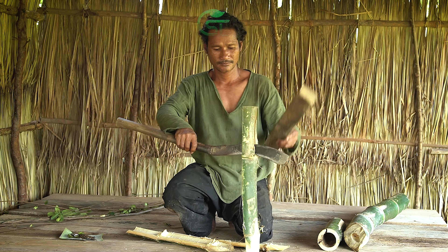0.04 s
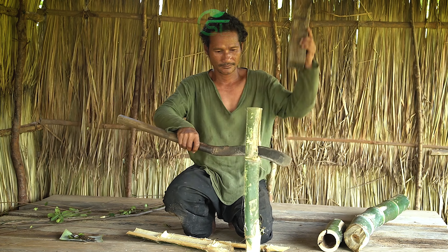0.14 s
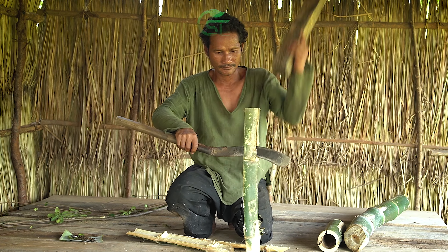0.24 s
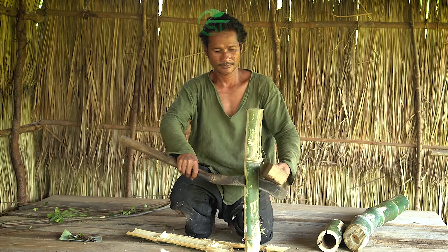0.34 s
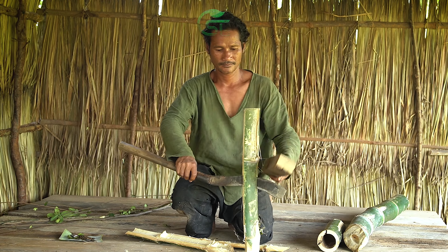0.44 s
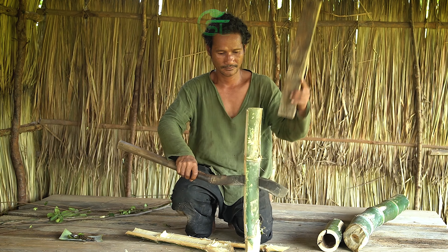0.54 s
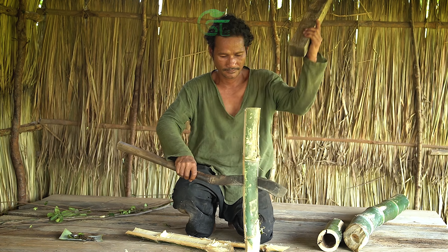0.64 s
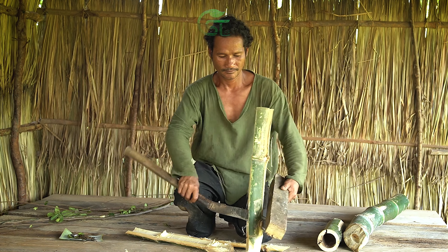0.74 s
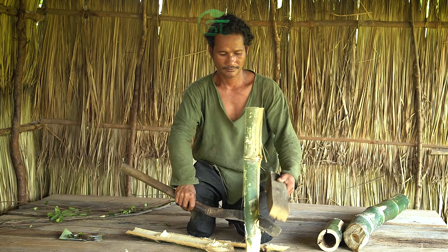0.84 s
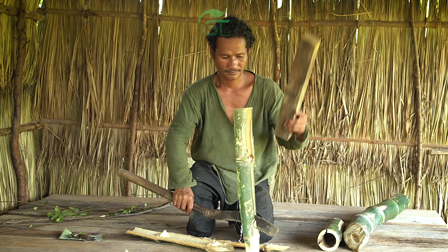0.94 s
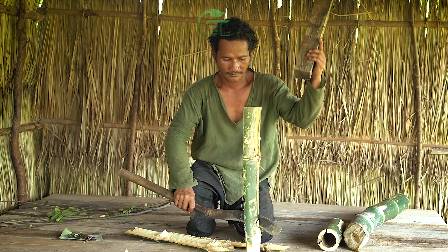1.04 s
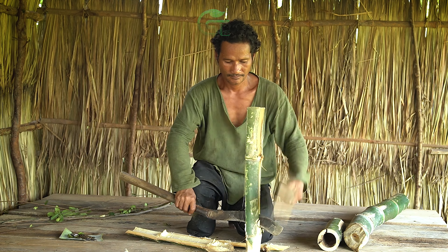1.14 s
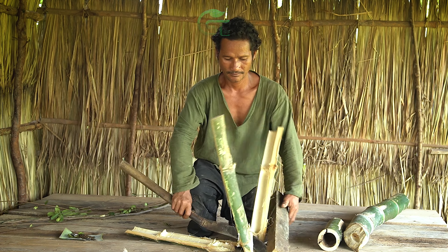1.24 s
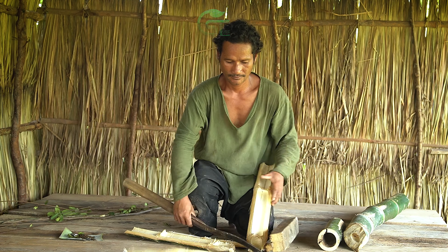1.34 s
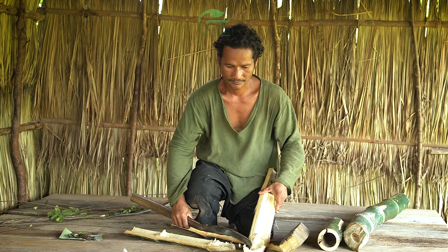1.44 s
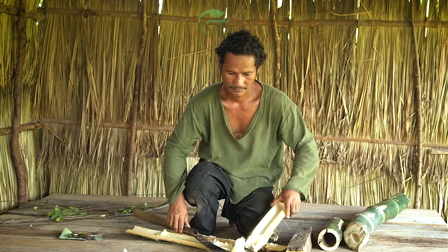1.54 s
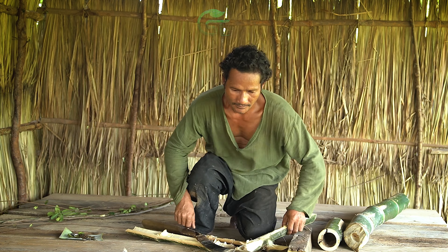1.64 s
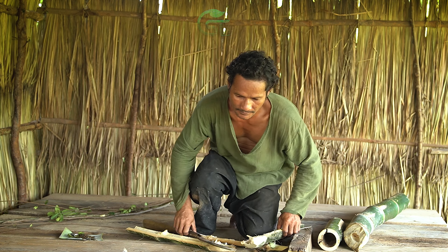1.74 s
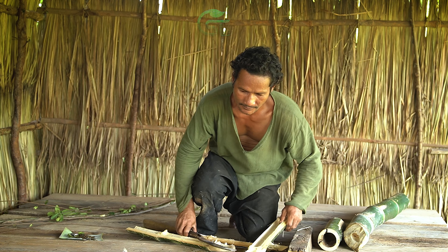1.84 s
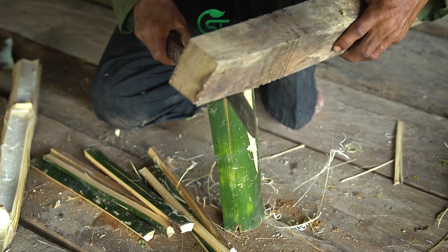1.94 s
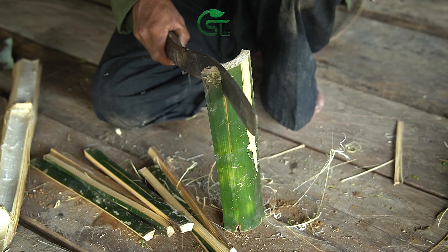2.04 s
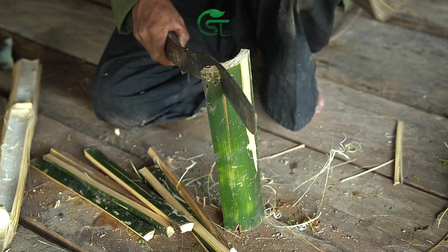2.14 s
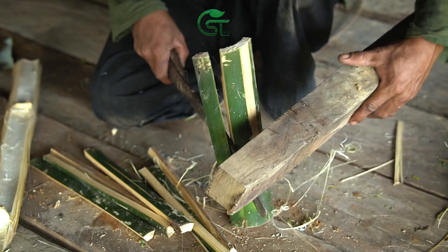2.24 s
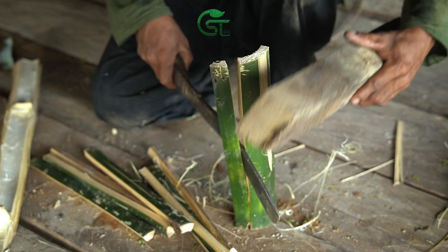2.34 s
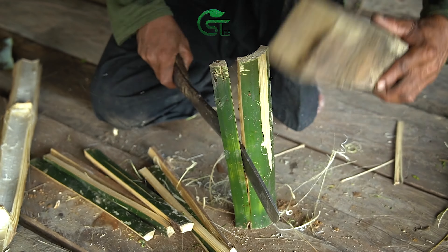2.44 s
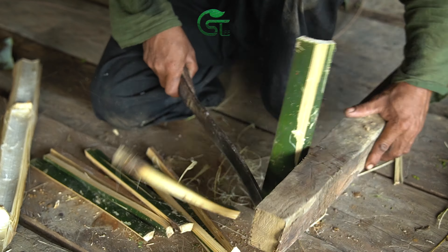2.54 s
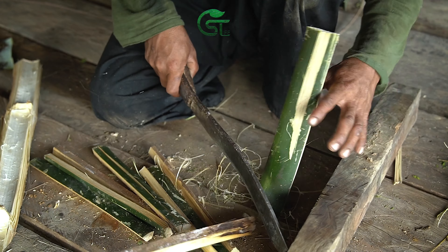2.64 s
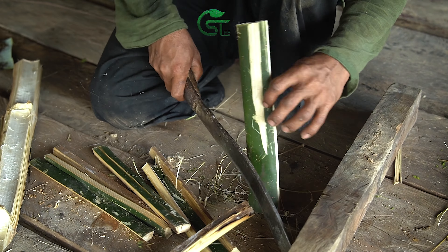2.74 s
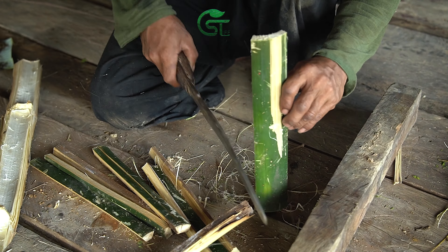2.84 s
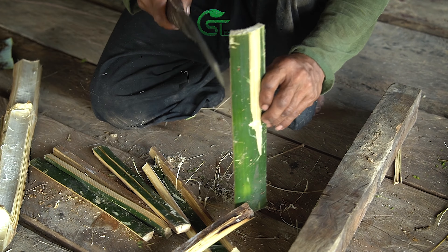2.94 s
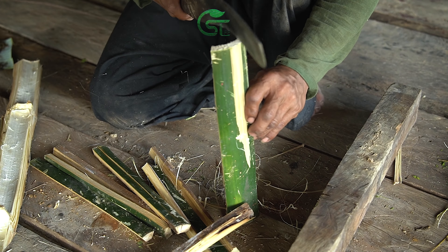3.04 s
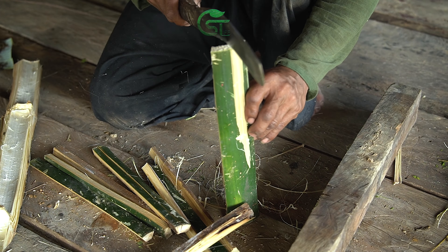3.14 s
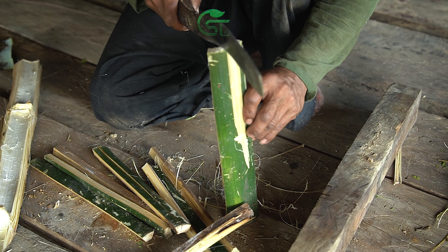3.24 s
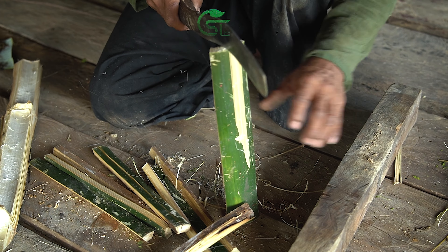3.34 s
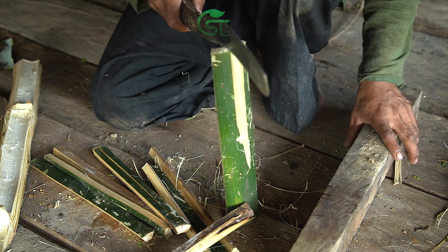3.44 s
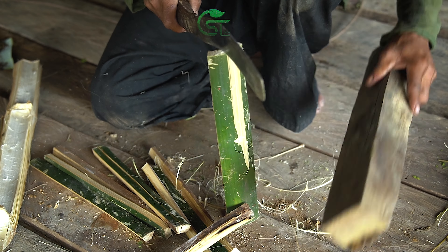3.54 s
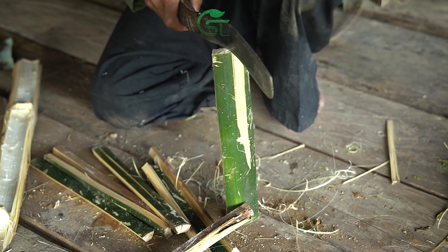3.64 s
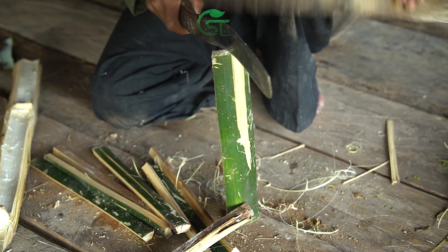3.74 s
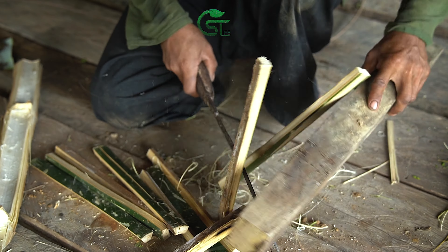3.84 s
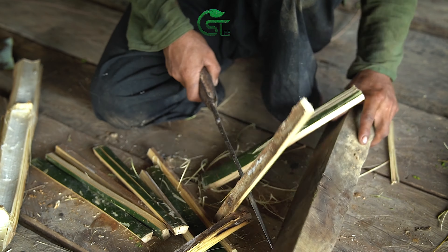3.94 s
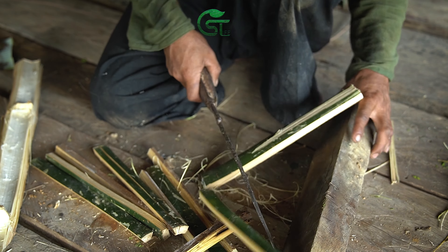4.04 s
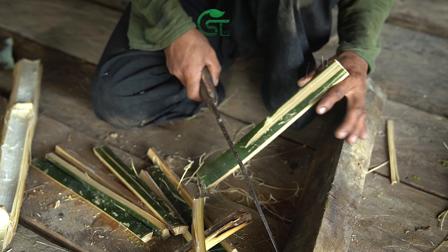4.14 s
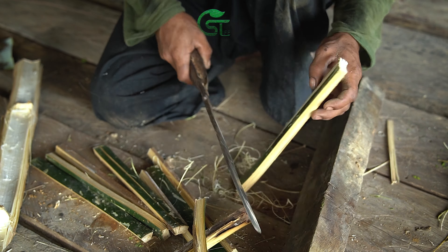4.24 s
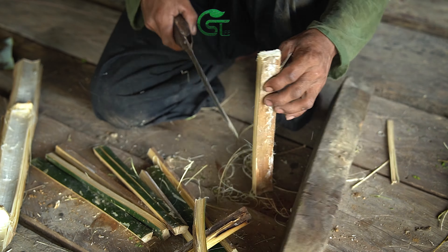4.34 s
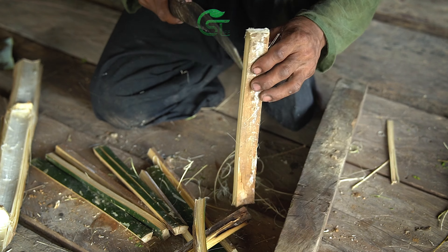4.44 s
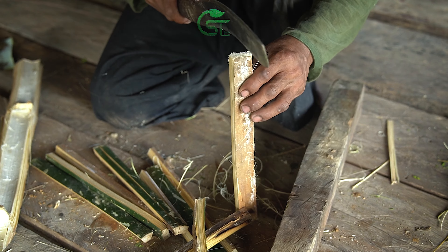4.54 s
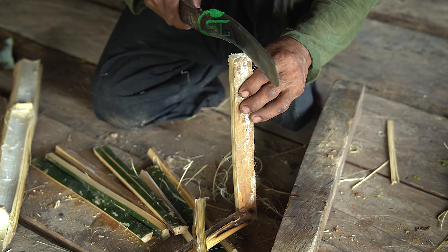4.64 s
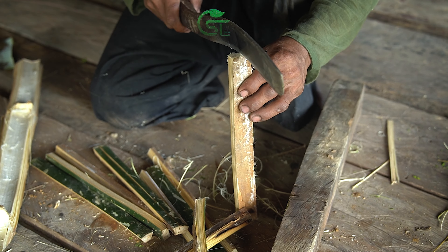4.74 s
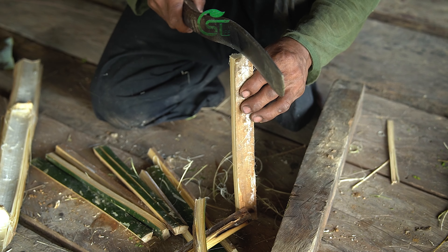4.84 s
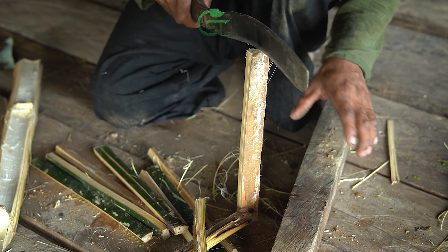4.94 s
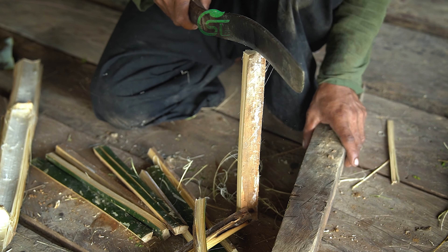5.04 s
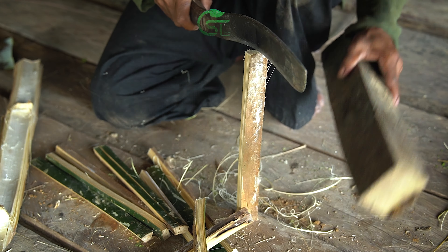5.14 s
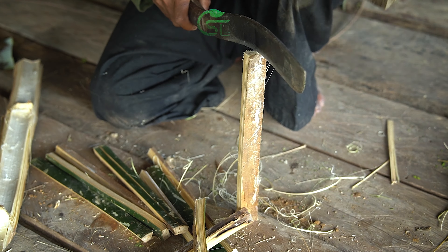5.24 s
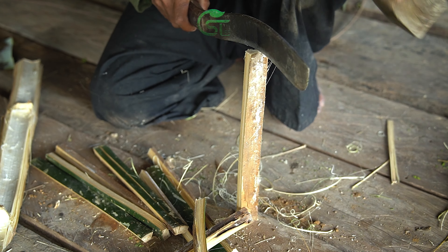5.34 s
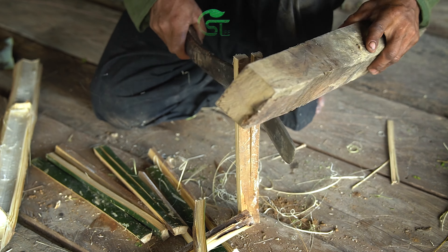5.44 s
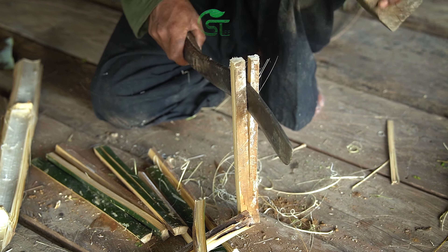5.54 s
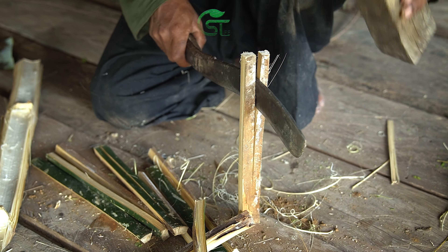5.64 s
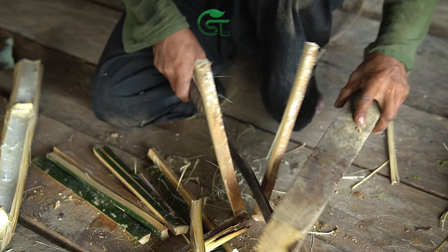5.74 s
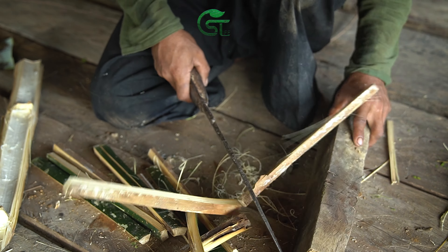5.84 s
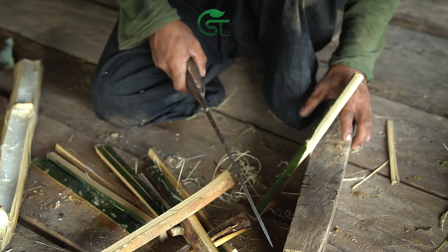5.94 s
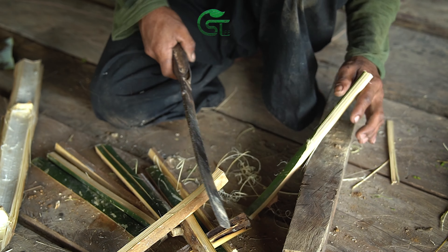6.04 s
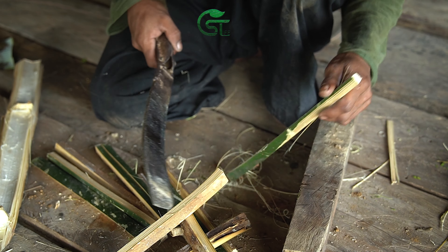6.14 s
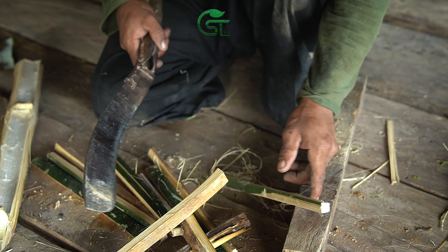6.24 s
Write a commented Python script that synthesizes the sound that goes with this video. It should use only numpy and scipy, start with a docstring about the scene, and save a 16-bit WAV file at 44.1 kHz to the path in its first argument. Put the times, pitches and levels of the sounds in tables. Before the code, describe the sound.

Close, sharp knocks of wood on steel split bamboo, the pieces rattling on a wooden floor over faint birdsong.

```python
"""A sharp crack and a ring of steel, close by: a wooden club drives a blade down through bamboo.
The microphone stands inside a thatched hut with a plank floor. The blade chatters in the cut, fibres
tear along the grain, and the split pieces fall, rattle and ring on the planks; a sleeve brushes past.
Farther off, outside, insects chirp and buzz with their wings and a small bird whistles over a faint
hush of open air."""
import sys
import numpy as np
from scipy import signal
from scipy.fft import rfft, irfft, next_fast_len
from scipy.io import wavfile
from scipy.ndimage import uniform_filter1d, minimum_filter1d

SR = 44100
rng = np.random.default_rng(int(sys.argv[2]) if len(sys.argv) > 2 else 0)


def materialize(psi):
    """Save the field psi as 16-bit PCM at rate SR to the path in sys.argv[1].

    A 1-D psi becomes a single channel; in a 2-D psi each row is a channel.
    """
    bounded = np.clip(np.atleast_2d(psi).T, -1, 1)
    quanta = np.round(bounded * 32767).astype(np.int16)
    wavfile.write(sys.argv[1], SR, quanta)


N = 277389

# Steel and club struck, together or against wood. Each row: start in seconds, levels in dB of the
# crack, upper blade ring, lower blade ring and club ring, then the chatter's t60 in seconds.
BLOWS = [(0.335, -23, -17.5, -22, -12.5, 0.085), (0.766, -41, -11, -17.5, -25, 0.11),
         (1.2044, -22, -8.5, -50, -32, 0.091), (1.474, -39, -32, -21, -42, 0.036),
         (1.621, -39, -31, -9.5, -42, 0.036), (2.247, 0, -10, -14, -14, 0.063),
         (2.326, -36, -72, -71, -35.5, 0.014), (2.5437, -15, -49, -13, -3, 0.021),
         (2.66, -28, -50, -27, -32, 0.024), (3.8202, -11.5, -15, -25, -42, 0.12),
         (3.896, -41, -53, -42, -10, 0.028), (3.935, -45, -63, -51, -16, 0.021),
         (4.0855, -45, -29, -25.5, -27, 0.013), (5.4289, -20, -14, -19, -37, 0.042),
         (5.744, -4.5, -30, -4.5, -5, 0.033), (5.897, -36, -31.5, -42, -25, 0.015),
         (6.084, -58, -80, -42, -65, 0.17)]
# The stem tearing. Each row: start and rise in seconds, peak level in dB, tilt at the peak in dB per
# octave, fade in dB per second.
SPLITS = [(0.337, 0.029, -12.5, -1, 1100), (0.769, 0.01, -24, 2, 447), (1.209, 0.01, -2, 0, 420),
          (2.25, 0.015, -16, -5, 928), (2.543, 0.026, -10.5, -4, 647), (3.819, 0.038, -6, -1, 305),
          (5.43, 0.023, -4.5, -1, 651), (5.764, 0.04, -9.5, -2.5, 600)]
# Pieces and tools meeting wood. Each row: start in seconds, level in dB, tilt in dB per octave,
# ring pitch in Hz, the rattle's t60 at 1 kHz in seconds.
KNOCKS = [(0.387, -14.5, 7, 4970, 0.051), (0.393, -16, 0.5, 3180, 0.12), (0.475, -41, 7, 850, 0.11),
          (0.981, -48.5, 15, 1465, 0.11), (1.363, -7, -1.5, 395.6, 0.2), (1.412, 6, 1.5, 849, 0.11),
          (1.474, 2, 1.5, 3224, 0.094), (1.532, -7, -0.5, 721, 0.19), (1.588, -13.5, 0, 656, 0.3),
          (1.621, -5, 1.5, 1900, 0.069), (1.665, -24, 0.5, 672, 0.15), (1.678, -13.5, 1.5, 2230, 0.066),
          (1.793, -23, 4, 437, 0.11), (1.899, -17.5, -0.5, 588, 0.15), (1.981, -11, 2, 3210, 0.06),
          (2.005, -63, 5, 500, 0.02), (2.02, -31, 4, 360, 0.054), (2.041, -52, 3, 398, 0.03),
          (2.335, -31.5, 2, 445, 0.13), (2.369, -50, 15, 325, 0.14), (2.388, -40.5, -9, 212, 0.13),
          (2.44, -46, 2, 203, 0.17), (2.555, 4.5, 0, 439, 0.065), (2.571, -0.5, 0, 1152, 0.1),
          (2.63, -30, 2, 1620, 0.05), (2.641, 2.5, -1, 386, 0.084), (2.66, -9, 2, 3650, 0.057),
          (2.687, 0.5, 0, 470, 0.09), (2.738, -27.5, -1.5, 440, 0.083), (2.78, -27.5, -6, 393, 0.13),
          (2.816, -40, 0.5, 398, 0.12), (2.968, -40, -6, 1440, 0.051), (3.061, -16.5, -4, 1520, 0.067),
          (3.271, -48, -12, 298, 0.16), (3.565, -37.5, 2, 720, 0.093), (3.626, -51, -3, 2210, 0.18),
          (3.838, -6.5, -6, 570, 0.023), (3.861, 4.5, 0, 432, 0.04), (3.896, -5.5, 1.5, 1250, 0.068),
          (3.931, -6.5, -2.5, 1070, 0.066), (3.954, -37, 10, 323, 0.11), (4.041, -12, -5.5, 361, 0.1),
          (4.052, -25, 2.5, 493, 0.058), (4.088, -9.5, -2, 2300, 0.04), (4.124, -23, -7, 647, 0.05),
          (4.144, -14.5, 1.5, 552, 0.091), (4.187, -28, -1.5, 557, 0.094), (4.221, -34.5, -1, 399, 0.3),
          (4.433, -10.5, -6.5, 298, 0.059), (4.444, -12.5, 1.5, 1360, 0.044),
          (4.452, -16.5, 0.5, 1420, 0.051), (4.459, -28, 0, 1350, 0.037), (4.484, -10, -8, 460, 0.062),
          (4.527, -25.5, -10, 318, 0.096), (4.553, -22, -9.5, 447, 0.06), (4.589, -14, -3, 1387, 0.071),
          (4.805, -32.5, -10, 400, 0.053), (5.49, -8.5, 0, 472, 0.079), (5.773, 12, 1, 493, 0.058),
          (5.793, -3, 0.5, 1520, 0.072), (5.825, -7.5, -4, 1015, 0.1), (5.875, -9, -15, 680, 0.072),
          (5.884, 1, 0, 452, 0.086), (5.983, -4, -0.5, 832, 0.037), (6.007, -5.5, -0.5, 1357, 0.068),
          (6.057, -14, 0.5, 2110, 0.066), (6.084, -21, -0.5, 1314, 0.081), (6.264, -22.5, -2.5, 432, 0.089)]
# Modes of the steel blade. Each row: pitch in Hz, relative level in dB, width in Hz.
BLADE_MODES = [(2145, 0, 40), (3100, -12, 70), (3950, -9, 70), (4900, -2, 110), (5070, -1, 80),
               (5330, 0, 90), (5665, -8, 90), (7800, -9, 200), (8330, -8, 150), (9300, -16, 300),
               (11560, -24, 200)]
# Modes of the hollow stem. Each row: pitch in Hz, width in Hz, relative level in dB.
STEM_MODES = [(404, 40, -10.5), (468.5, 47, -4.5), (735, 60, -0.5), (1176, 87, -3.5)]
# The colour of bamboo noise. Each row: frequency in Hz, relative level in dB.
BAMBOO_COLOUR = [(40, -12), (100, -18), (224, -12.5), (400, -1), (800, -3.5), (1500, -4.5), (2500, -7),
                 (5000, -9), (9000, -12), (16500, -24)]
# A sleeve or hand brushing past. Each row: start in seconds, level in dB, length in seconds.
RUSTLES = [(3.571, -51, 0.14), (3.71, -54.5, 0.089)]
# Scatter reaching the microphone from the sides. Each row: frequency in Hz, side against mid in dB.
SIDE_SCATTER = [(60, -21), (240, -96), (950, -23.5), (3770, -10), (15000, -5)]
# A chirping insect. Each row: start in seconds, level in dB, length in seconds, pitch in Hz,
# pulses per second.
CHIRPS = [(0.074, -59.5, 0.09, 11500, 82), (0.447, -56, 0.11, 11700, 94.4),
          (0.878, -55.5, 0.083, 11600, 74), (2.932, -52.5, 0.039, 11800, 57),
          (3.031, -52.5, 0.039, 11800, 57), (5.519, -44, 0.045, 11640, 72)]
# A buzzing insect. Each row: start in seconds, level in dB, length in seconds.
BUZZES = [(0.207, -61, 0.14), (2.13, -62, 0.22), (2.948, -69, 0.11), (3.087, -68.5, .13), (5.08, -67, 0.12),
          (5.635, -65, 0.16), (5.905, -67, .12)]
# The bird's glides. Each row: start and length in seconds, first and last pitch in Hz, level in dB.
BIRD_GLIDES = [(0.01, 0.13, 4150, 3190, -50), (1.052, 0.029, 4200, 3040, -51),
               (1.146, 0.067, 2130, 2410, -46), (1.708, 0.023, 3660, 3180, -47),
               (1.739, 0.03, 3600, 5000, -48.5), (1.767, 0.013, 3850, 3050, -46.5),
               (1.855, 0.019, 3600, 3050, -47), (1.875, 0.028, 3300, 4200, -49),
               (2.145, 0.045, 3390, 2720, -53), (2.378, 0.1, 3550, 2240, -48),
               (4.822, 0.11, 4930, 4800, -64), (5.06, .025, 5350, 5400, -60),
               (5.177, .085, 3950, 4050, -63), (5.32, .04, 5250, 5200, -64), (5.53, 0.062, 4680, 4300, -57),
               (6.192, 0.062, 2440, 2290, -49)]
# One warble: dip, peak, drop. Each row: seconds into the call, pitch in Hz, relative level in dB.
WARBLE_SHAPE = [(0, 3220, -9), (.045, 3000, -4), (.065, 3150, -2), (.085, 4200, 0), (.097, 4000, -1),
                (.115, 2900, -5)]
# The bird's warbled calls. Each row: start in seconds, level in dB.
WARBLES = [(.2, -53), (.585, -53)]
# The colour of the outdoor air. Each row: frequency in Hz, relative density in dB.
AIR_COLOUR = [(15, -36), (25, -19), (152, -4), (513, -14.5), (710, -16.5), (1550, -17), (1820, -17.5),
              (5230, -23), (10300, -29), (15800, -31)]
# How alike the air sounds left and right. Each row: frequency in Hz, correlation (1 is identical).
AIR_LIKENESS = [(60, 0.97), (240, 1), (950, 0.56), (3770, 0.072), (15000, 0.29)]
# The air's slow drift. Each row: time in seconds, treble and middle in dB, taken against the last row.
AIR_DRIFT = [(0.0, -51, -42), (1.19, -46.5, -41), (1.47, -45.5, -37), (1.93, -49, -43.5), (2.77, -55, -47),
             (6.29, -53, -43)]

BANDS_HZ = 125 * 2. ** np.arange(8)
CRACK_TILT_DB = 5  # per octave
TEAR_START_DB, TEAR_START_TILT_DB, TEAR_DULLING_DB_PER_S = -7.5, 2.5, 60
RING_DB, RING_LOSS = -7.5, 0.14  # ring of a 0 dB knock; louder ones ring a little less for their level
SOFTENING = 0.39  # dB of longer rise for each dB per octave of duller contact
OVERTONE_RATIO, OVERTONE_DB = 2.7, -7.5  # a low-pitched loose piece also bends in a higher mode
FULLER_BASS_S = 2.0  # from here on the work sounds fuller, with more bass
EARLY_LOW_CUT_HZ, LATE_LOW_CUT_HZ, TOP_HZ = 257, 132, 16900
GLIDE_FADE_DB, GLIDE_WAVER, WARBLE_WAVER = -4, .04, .008  # waver as a share of the pitch


def blows():
    """Close up: a bright crack, then the blade chatters in the cut and rings, and so does the club."""
    crack = np.zeros((len(BANDS_HZ), N))
    upper, lower, club = np.zeros((3, N))
    snap = decay(0.0079, rise=.0001) + 0.59 * decay(0.061)
    for s, crack_db, upper_db, lower_db, club_db, t60 in BLOWS:
        add(crack, s, gain_of(crack_db) * tilt(CRACK_TILT_DB) * snap)
        shape = decay(t60) + 0.051 * decay(3 * t60) + 2.13 * decay(0.0053)
        for drive, db in ((upper, upper_db), (lower, lower_db), (club, club_db)):
            add(drive, s, gain_of(db) * shape)
    chatter = crackle(spread_db=0.97, per_s=3000) + contact(BLOWS, 3.2)
    strike = chatter + contact(BLOWS, 9.8)
    steel = sum(gain_of(db) * struck(strike * (lower if hz < 4000 else upper), hz, width)
                for hz, db, width in BLADE_MODES)
    wood = struck(strike * club, hz=2570, width=80)
    # a blow just before the start leaves one mode dying away
    dying = gain_of(-51 - 60 * np.arange(N) / SR / 0.84)
    opening_ring = dying * resonate(rng.standard_normal(N), hz=2207, width=70)
    return (crack * octaves(chatter)).sum(0) + steel + wood + opening_ring


def splits():
    """The stem tears as the blade runs down: soft and bright at first, dulling as it fades."""
    envelope = np.zeros((len(BANDS_HZ), N))
    t = np.arange(SR // 4) / SR
    for s, rise, db, tilt_db, fade in SPLITS:
        early, late = np.maximum(1 - t / rise, 0), np.maximum(t - rise, 0)
        colour = tilt(tilt_db + TEAR_START_TILT_DB * early - TEAR_DULLING_DB_PER_S * late)
        add(envelope, s, gain_of(db + TEAR_START_DB * early - fade * late) * colour)
    fibres = octaves(crackle(spread_db=2.1, per_s=1500))
    return hollow_stem((envelope * fibres).sum(0))


def knocks():
    """On the planks: a tick, a woody rattle whose treble dies first, and the struck piece's ring."""
    envelope, rings = np.zeros((len(BANDS_HZ), N)), np.zeros(N)
    t = np.arange(SR // 4) / SR
    crest_db = 7.5  # peak over rms of a rattle
    lasting = (BANDS_HZ[:, None] / 1000) ** -.35
    for s, db, tilt_db, hz, t60 in KNOCKS:
        rise = 0.00083 * lasting ** 2 * gain_of(-SOFTENING * tilt_db)
        shape = decay(t60 * lasting, rise) + 0.35 * decay(0.015 * lasting)
        add(envelope, s, gain_of(db - crest_db) * tilt(tilt_db) * shape)
        overtone = gain_of(OVERTONE_DB) * (hz < 900) * np.sin(2 * np.pi * OVERTONE_RATIO * hz * t)
        ring = decay(0.66 * t60, rise=0.00089) * (np.sin(2 * np.pi * hz * t) + overtone)
        add(rings, s, gain_of(db + RING_DB - RING_LOSS * db) * ring)
    rattle = crackle(spread_db=1.93, per_s=3000) + contact(KNOCKS, 3.5)
    # the ring shudders with the bouncing contact
    shudder = 1 + 0.75 * evened(uniform_filter1d(rattle, size=150))
    return hollow_stem((envelope * octaves(rattle)).sum(0)) + rings * shudder


def hollow_stem(x):
    """The hollow modes of the stem lift parts of the sound a little."""
    return x + sum(gain_of(db) * resonate(x, hz, width) for hz, width, db in STEM_MODES) / 30


def crackle(spread_db, per_s):
    """Fibres snapping at random over a smooth rub, rms 1."""
    sizes = gain_of(spread_db * np.minimum(rng.exponential(1, N), 4))
    snaps = sizes * (rng.random(N) < per_s / SR) * rng.choice([-1., 1.], N)
    return evened(evened(snaps) + 0.84 * rng.standard_normal(N))


def contact(events, size):
    """The first touch of each event: one firm click just after its start."""
    clicks = np.zeros(N)
    clicks[[round(row[0] * SR) + 24 for row in events]] = size
    return clicks


def rustles():
    """A sleeve or hand brushes past in soft swells of bright rubbing noise."""
    envelope = np.zeros(N)
    for s, db, length in RUSTLES:
        add(envelope, s, gain_of(db) * np.hanning(round(length * SR)))
    rub = (tilt(2.3) * octaves(rng.standard_normal(N))).sum(0)
    return envelope * evened(rub)


def hut(x):
    """Thatch swallows most sound: a short tail, planks booming low, treble scattered to the sides."""
    lean, full = (signal.lfilter(*signal.butter(3, hz, "high", fs=SR), x)
                 for hz in (EARLY_LOW_CUT_HZ, LATE_LOW_CUT_HZ))  # early on the work is cut harder in the bass, later less
    direct = np.where(np.arange(N) < FULLER_BASS_S * SR, lean, full)
    mid = direct + gain_of(-15) * reflections(direct, t60=0.092)
    mid += gain_of(-36.5) * resonate(mid, hz=101.6, width=16)  # the planks
    size = next_fast_len(N)
    scatter = gain_of(read(SIDE_SCATTER, np.fft.rfftfreq(size, 1 / SR)))
    side = irfft(rfft(reflections(mid, t60=0.043), size) * scatter, size)[:N]
    return np.array([mid + side, mid - side])


def reflections(x, t60):
    """A short room tail, slowly blended between two random patterns so no pitch stands out."""
    tails = rng.standard_normal((2, SR // 4)) * gain_of(-60 * np.arange(SR // 4) / SR / t60)
    blend = 2 * np.pi * 1.7 * np.arange(N) / SR
    fed = x * np.array([np.cos(blend), np.sin(blend)])
    return signal.oaconvolve(fed, tails / np.linalg.norm(tails[0]), axes=1).sum(0)[:N]


def insects():
    """Wing strokes outside: noise in high resonances, pulsed slowly to chirp and quickly to buzz."""
    out = np.zeros((2, N))
    for s, db, length, hz, rate in CHIRPS:
        t = np.arange(0, length + 0.014, 1 / SR)
        swell = np.minimum(t / length + 0.36, 1) * gain_of(-900 * np.maximum(t - length, 0))
        pulses = gain_of(-24 * (t * rate % 1)) * swell
        noise = rng.standard_normal((2, len(t)))
        add(out, s, gain_of(db) * resonate(pulses * (noise + noise[0]), hz, width=910))
    for s, db, length in BUZZES:
        t = np.arange(0, length, 1 / SR)
        pulses = (1 + 0.35 * np.cos(2 * np.pi * 215 * t)) * signal.windows.tukey(len(t), .3)
        noise = pulses * rng.standard_normal((2, len(t)))
        wings = sum(resonate(noise, hz, width=1400) for hz in (14400, 15500))
        add(out, s, gain_of(db) * wings)
    return out


def bird():
    """A small bird some way off: thin glides and warbles, blurred by echoes on the way in."""
    calls = np.zeros(N)
    for s, length, from_hz, to_hz, db in BIRD_GLIDES:
        along = np.linspace(0, 1, round(length * SR))
        pitch = from_hz + (to_hz - from_hz) * along ** 1.2
        add(calls, s, whistle(pitch, db + GLIDE_FADE_DB * along, GLIDE_WAVER))
    at, hz, shape_db = np.transpose(WARBLE_SHAPE)
    t = np.arange(0, at[-1], 1 / SR)
    for s, db in WARBLES:
        add(calls, s, whistle(np.interp(t, at, hz), db + np.interp(t, at, shape_db), WARBLE_WAVER))
    t = np.arange(SR // 4) / SR
    echoes = rng.standard_normal((2, len(t))) * gain_of(-60 * t / 0.35)
    echoes /= np.linalg.norm(echoes[0])
    return calls + .8 * signal.fftconvolve(calls[None], echoes, axes=1)[:, :N]


def whistle(hz, db, unsteady):
    """A sine that follows a pitch curve and wavers a little."""
    waver = 1 + unsteady * evened(uniform_filter1d(rng.standard_normal(len(hz)), size=120))
    phase = 2 * np.pi * np.cumsum(hz * waver) / SR
    return gain_of(db) * np.sin(phase) * signal.windows.tukey(len(hz), .3)


def outdoor_air():
    """Farthest back, a faint hush whose low, middle and high parts drift apart slowly."""
    frames, hz = N // 256 + 5, np.fft.rfftfreq(1024, 1 / SR)
    left_re, left_im, apart_re, apart_im, patches = rng.standard_normal((frames, 513, 5)).T
    patches = evened(uniform_filter1d(uniform_filter1d(patches, size=12, axis=0), size=14, axis=1))
    s, treble_db, middle_db = np.transpose(AIR_DRIFT)
    t = np.arange(frames) * 256 / SR
    treble, middle = (np.interp(t, s, db) - db[-1] for db in (treble_db, middle_db))
    drift_db = np.outer(read([(200, 0.0), (700, 0.64), (2200, 1.0), (4000, 0.3)], hz), middle)
    drift_db += np.outer(read([(2200, 0.12), (4000, 1.0), (8000, 0.8), (13000, 0.49)], hz), treble)
    likeness = np.clip(read(AIR_LIKENESS, hz), -1, 1)[:, None]
    left = left_re + 1j * left_im
    right = likeness * left + np.sqrt(1 - likeness ** 2) * (apart_re + 1j * apart_im)
    spectra = np.array([left, right]) * gain_of(read(AIR_COLOUR, hz)[:, None] + 1.7 * patches)
    steady = signal.istft(spectra, nperseg=1024, noverlap=768)[1]
    drifting = signal.istft(spectra * gain_of(drift_db), nperseg=1024, noverlap=768)[1]
    return gain_of(-52.5) * drifting[:, :N] / np.sqrt(np.mean(steady ** 2))


def octaves(x):
    """Splits a sound into overlapping octave bands, coloured like bamboo."""
    size = next_fast_len(N)
    hz = np.fft.rfftfreq(size, 1 / SR)
    place = np.clip(np.log2((hz + 1) / BANDS_HZ[0]), 0, len(BANDS_HZ) - 1)
    shares = np.maximum(1 - abs(place - np.arange(len(BANDS_HZ))[:, None]), 0)
    bands = irfft(rfft(x, size) * gain_of(read(BAMBOO_COLOUR, hz)) * shares, size)[:, :N]
    return bands / np.std(bands.sum(0))


def tilt(db_per_octave):
    """Band gains: harder contact tips the spectrum up around 1 kHz; soft contact also cuts the top."""
    above = np.log2(BANDS_HZ / 1000)[:, None]
    slope_db = np.minimum(above * db_per_octave, abs(db_per_octave))
    top_db = 1.37 * np.maximum(above - 1, 0) ** 2 * np.minimum(db_per_octave - 3.0, 0)
    return gain_of(slope_db + top_db)


def struck(x, hz, width):
    """A mode that answers a blow within a millisecond."""
    r, quick = np.exp(-np.pi * width / SR), np.exp(-np.pi * 700 / SR)
    turn = np.exp(2j * np.pi * hz / SR)
    poles = np.convolve([1, -r * turn], [1, -quick * turn])
    return 2 * np.sqrt(1 - r) * (1 - quick) * signal.lfilter([1], poles, x).real


def resonate(x, hz, width):
    """A resonance with steep skirts; white noise roughly keeps its rms."""
    r = np.exp(-np.pi * width / SR)
    pole = [1, -r * np.exp(2j * np.pi * hz / SR)]
    ringing = signal.lfilter([1], pole, signal.lfilter([1], pole, x)).real
    return 2 * (1 - r) * np.sqrt(2 * (1 - r * r)) * ringing


def decay(t60, rise=0.00064):
    """Quick rise, then a fall of 60 dB in t60 seconds."""
    t = np.arange(SR // 4) / SR
    return (1 - np.exp(-t / rise)) * gain_of(-60 * t / t60)


def gain_of(db):
    """Decibels to amplitude."""
    return 10 ** (np.asarray(db) / 20)


def evened(x):
    """Scales to rms 1."""
    return x / np.sqrt(np.mean(x ** 2) + 1e-20)


def read(points, hz):
    """Reads a spectrum on a log-frequency axis."""
    f, value = np.transpose(points)
    return np.interp(np.log(hz + 1), np.log(f + 1), value)


def add(mix, s, sound):
    """Mixes a sound in at s seconds."""
    part = mix[..., round(s * SR):][..., :sound.shape[-1]]
    part += sound[..., :part.shape[-1]]


def scene():
    """The work close by in the hut, with air, insects and bird beyond the walls."""
    return hut(blows() + splits() + knocks() + rustles()) + outdoor_air() + insects() + bird()


def record(dry):
    """Behind the microphone, a fast limiter holds down loud hits; then the extreme treble is cut."""
    peak_db = 20 * np.log10(-minimum_filter1d(-abs(dry).max(0), size=96) + 1e-9)
    release_db = np.arange(N) * 400. / SR
    held_db = np.maximum.accumulate(peak_db + release_db) - release_db
    over_db = np.maximum(held_db + 6, 0)
    limited = dry / gain_of(.75 * uniform_filter1d(over_db, size=48))  # 4:1 above -6 dB
    low_pass = signal.firwin(511, TOP_HZ, window=("kaiser", 9), fs=SR)
    return signal.oaconvolve(limited, low_pass[None], "same")


dry = scene()
out = record(dry)
materialize(out)
```